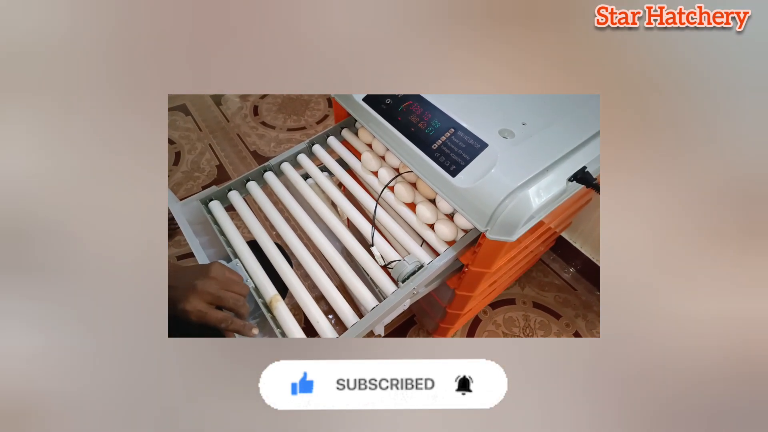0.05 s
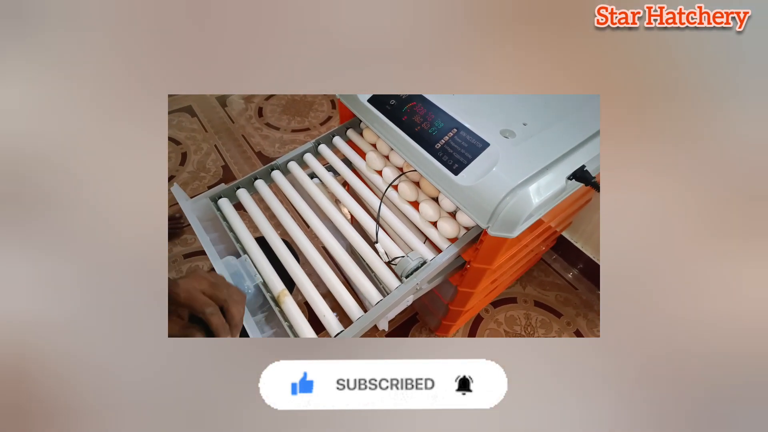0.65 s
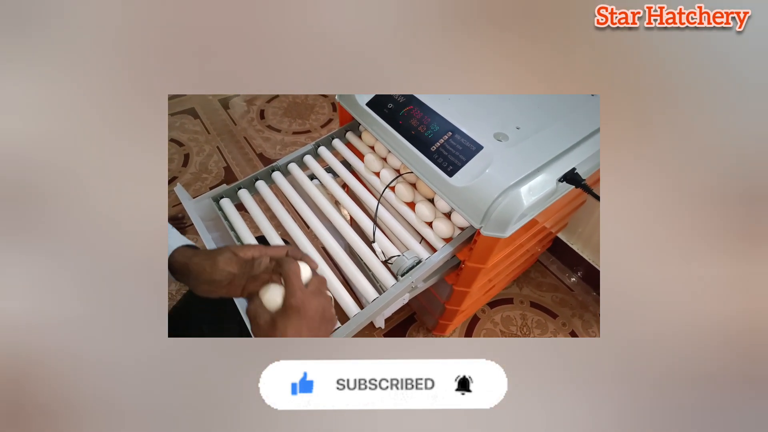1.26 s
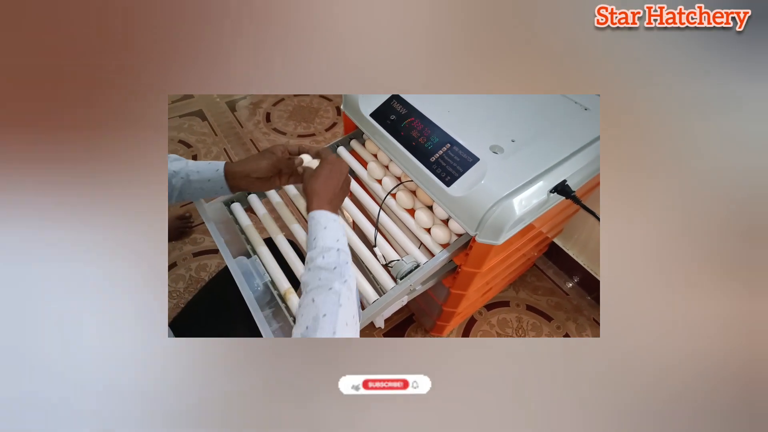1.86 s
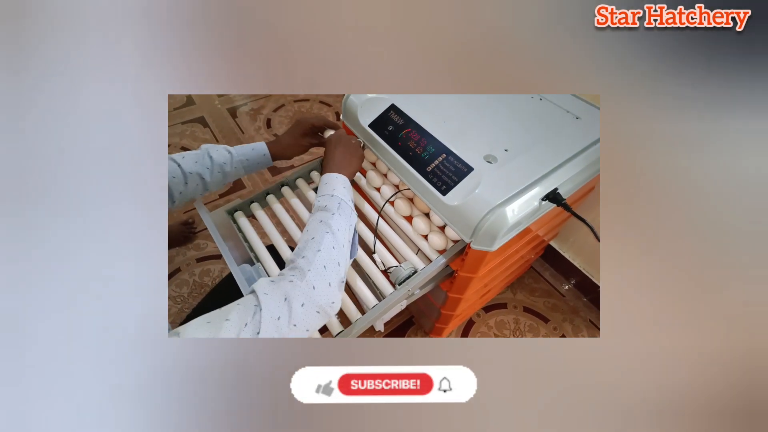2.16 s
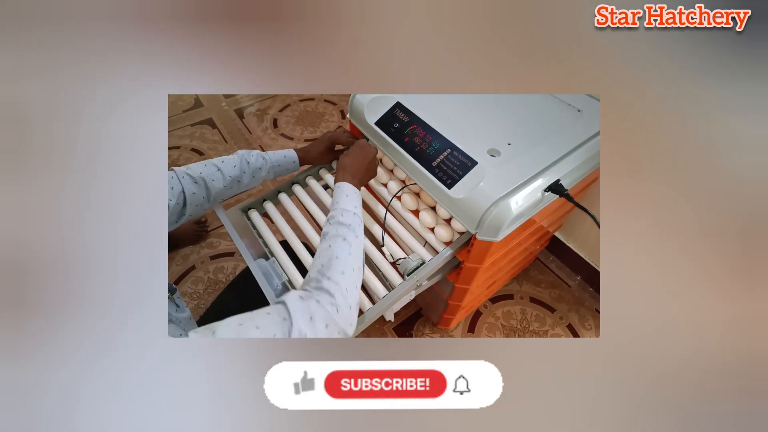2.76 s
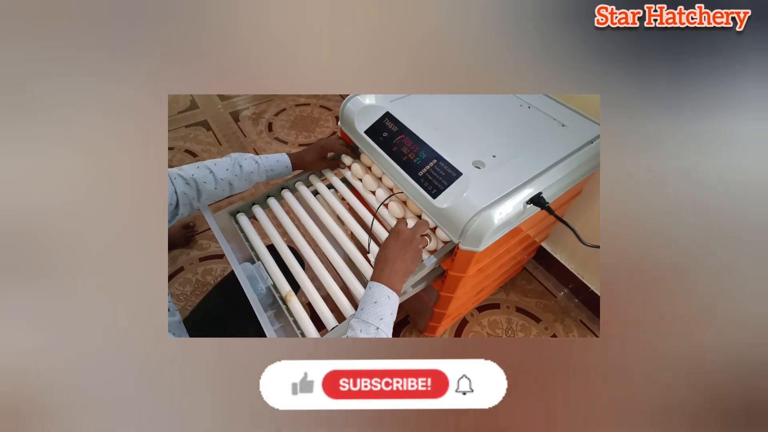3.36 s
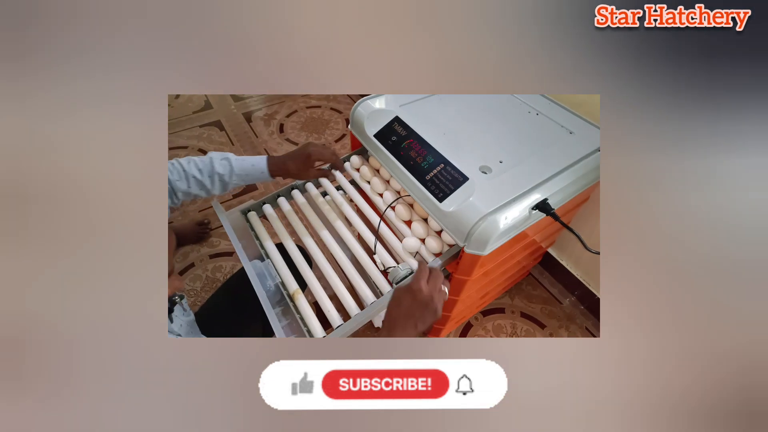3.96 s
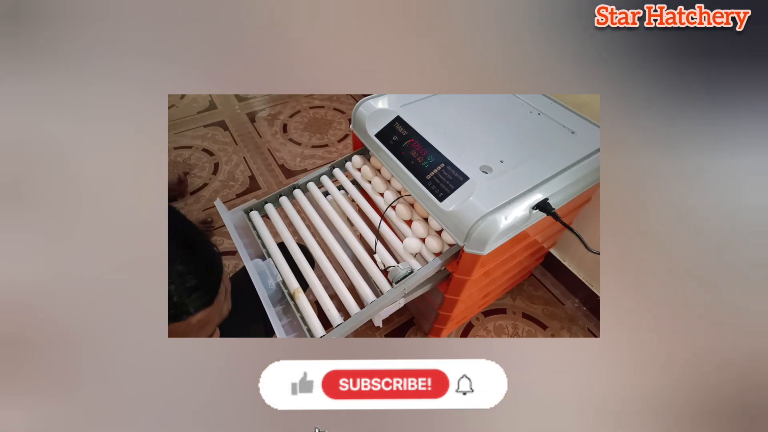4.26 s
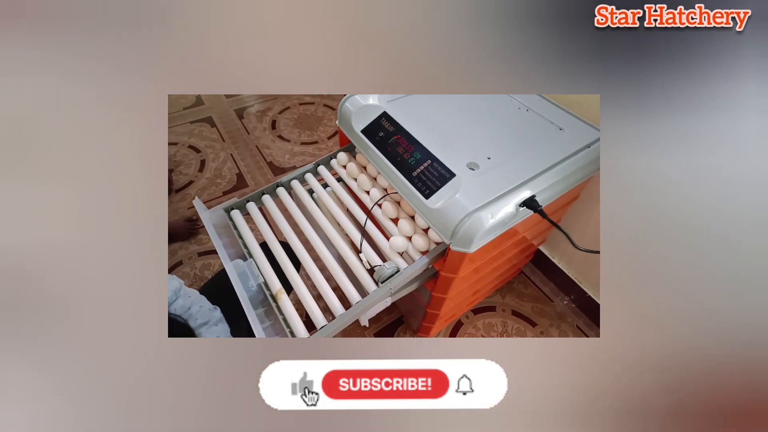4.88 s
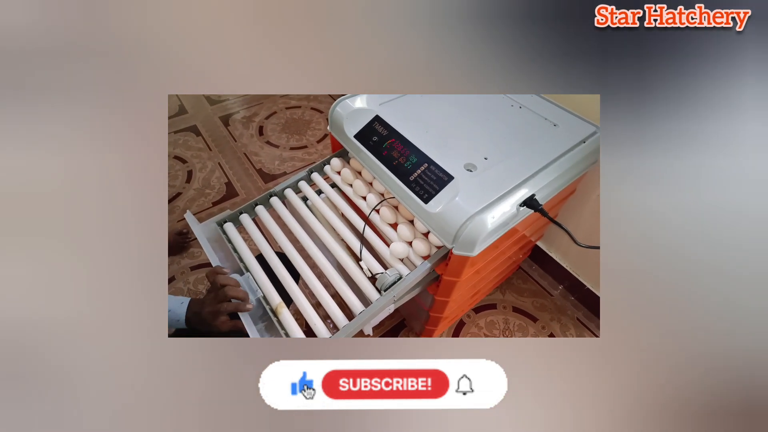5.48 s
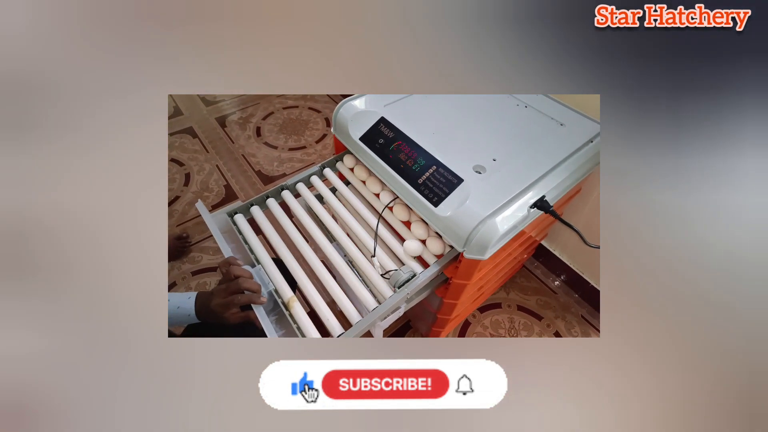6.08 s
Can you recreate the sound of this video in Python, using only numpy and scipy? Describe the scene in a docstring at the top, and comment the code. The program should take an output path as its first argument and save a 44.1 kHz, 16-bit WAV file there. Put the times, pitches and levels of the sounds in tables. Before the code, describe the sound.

Eggs tap lightly against each other and against plastic rollers, in scattered, delicate clinks over the faint hum and hiss of a fan. In the last third, the plastic drawer holding them rattles loudly, rasps and bumps against its housing, then shifts twice more with weaker clicks, scrapes and thumps as the eggs jostle. The sounds are clear and direct, with only a little small-room echo.

```python
"""A small room, where an incubator's fan hums faintly. Eggs are set by hand on the plastic rollers
of its tray: each soft impact excites damped modes of a shell or a hollow roller, giving many
small, soft-edged clinks. Later the tray is handled: hard contacts click, stick-slip friction
rasps, loose rollers rattle and the drawer thumps against its housing."""
import sys
import numpy as np
from scipy import signal
from scipy.fft import rfft, irfft, next_fast_len
from scipy.io import wavfile
from scipy.ndimage import uniform_filter1d, map_coordinates

SR = 44100
rng = np.random.default_rng(int(sys.argv[2]) if len(sys.argv) > 2 else 0)


def persist_wave(psi):
    """Save psi, clipped to +-1, as 16-bit WAV."""
    counts = np.round(np.clip(psi, -1, 1) * 32767).astype(np.int16)
    wavfile.write(sys.argv[1], SR, np.atleast_2d(counts).T)


N = 270333
TIME = np.arange(N) / SR


def amp(db):
    """Amplitude ratio of a level in decibels."""
    return 10 ** (np.asarray(db) / 20)


def unit_rms(x):
    """Normalisation to rms 1."""
    return x / np.sqrt(np.mean(x ** 2) + 1e-20)


def unit_peak(x):
    """Normalisation to peak 1."""
    return x / np.abs(x).max()


def along(points, hz):
    """Interpolation of (f/Hz, value) points on a logarithmic frequency axis."""
    f, values = np.transpose(points)
    return np.interp(np.log(hz + 1), np.log(f + 1), values)


def wobble(rate):
    """Random modulation: a smooth curve through `rate` knots a second."""
    return map_coordinates(rng.standard_normal(int(N * rate / SR) + 4), [TIME * rate])


def filtered(x, response):
    """Linear filtering: the spectrum is multiplied by a frequency response."""
    size = next_fast_len(N + SR // 2)
    return irfft(rfft(x, size) * response(np.fft.rfftfreq(size, 1 / SR)), size)[:N]


def coloured(x, spectrum):
    """Spectral shaping by (f/Hz, level/dB) points, at rms 1."""
    return unit_rms(filtered(x, lambda hz: amp(along(spectrum, hz))))


def impulse_response(spectrum, size=1024):
    """Minimum phase: folding the cepstrum gives a causal pulse with this spectrum."""
    magnitude = amp(along(spectrum, np.fft.rfftfreq(size, 1 / SR)))
    cepstrum = irfft(np.log(magnitude + 1e-6))
    cepstrum[1:size // 2] *= 2
    cepstrum[size // 2 + 1:] = 0
    return irfft(np.exp(rfft(cepstrum)))


def add(track, at, sound):
    """Superposition: a sound joins the track from `at` seconds."""
    start = max(round(at * SR), 0)
    track[start:start + len(sound)] += sound[:max(N - start, 0)]


def struck_modes(modes, scatter_db):
    """Free vibration: modes start at randomly scattered strengths and decay exponentially."""
    t = np.arange(SR // 4) / SR
    out = np.zeros(len(t))
    for k, (hz, db, t60) in enumerate(modes):
        envelope = amp(db + scatter_db * rng.standard_normal() - 60 * t / t60)
        out += (-1) ** k * envelope * np.sin(2 * np.pi * hz * t)
    return unit_peak(out)


def stroke(hold, rise, t60):
    """Envelope of a sustained contact: linear rise, hold, exponential decay."""
    t = np.arange(SR // 4) / SR
    return np.minimum(t / rise, 1) * amp(-60 * np.maximum(t - hold, 0) / t60)


# Reverberation time of the room: f/Hz, T60/s
ROOM_DECAY = [(150, 0.33), (1000, 0.31), (4500, 0.22), (10000, 0.024)]
def reverberation(x):
    """Diffuse reflections: a noise tail whose treble is absorbed fastest."""
    hz, t, bands = signal.stft(rng.standard_normal(SR // 2), SR, nperseg=256)
    decay = amp(-60 * t / along(ROOM_DECAY, hz)[:, None])
    tail = signal.istft(bands * decay, SR, nperseg=256)[1]
    return signal.fftconvolve(x, tail / np.linalg.norm(tail))[:N]


# Course of the air noise, in three consecutive spans: t/s, relative level/dB
AIR_LEVELS = [
    [(0.0, -56), (0.52, -52.5), (0.79, -61.5), (1.54, -57), (1.92, -57), (2.55, -54), (3.27, -60),
     (3.81, -54.5), (4.22, -56)],
    [(4.85, -53), (4.928, -56), (5.12, -58)],
    [(5.6, -54), (5.676, -55.5), (6.13, -57.5)],
]
# Spectra of the swirling air and of the hiss: f/Hz, relative level/dB
AIR_SPECTRUM = [(25, -39.5), (60, -18.5), (95, -4), (170, -7.5), (260, -4.5), (520, -3), (900, -6.5),
                (1300, -8), (1700, -5.5), (2200, -11), (2500, -18.5), (3100, -27.5), (5000, -28),
                (10000, -52.5)]
HISS_SPECTRUM = [(2000, -12), (4100, -6), (4750, 2), (5600, -12), (8200, -9.5), (10000, -20.5)]
# Motor tones: f/Hz, rms level/dB
MOTOR_TONES = [(100, -69.5), (280, -74.5), (525, -70)]
def fan(air_gain_db=1, flutter_db=2.72, waver_rad=0.91, hiss_db=-77):
    """Turbulence gives broadband noise, over a steady hiss and a slightly phase-modulated motor hum."""
    air_db = np.interp(TIME, *np.vstack(AIR_LEVELS).T) + air_gain_db + flutter_db * wobble(3.5)
    hum = sum(amp(db) * np.sqrt(2) * np.sin(2 * np.pi * hz * TIME + waver_rad * wobble(3.5))
              for hz, db in MOTOR_TONES)
    air = amp(air_db) * coloured(rng.standard_normal(N), AIR_SPECTRUM)
    hiss = amp(hiss_db) * coloured(rng.standard_normal(N), HISS_SPECTRUM)
    return air + hiss + hum


def slips(depth_db=6, judder_db=2):
    """Friction noise: shifting contact favours some bands for hundredths of a second, then others."""
    bands = signal.stft(rng.standard_normal(N), nperseg=512)[2]
    patches = uniform_filter1d(rng.standard_normal(bands.shape), size=3, axis=0)  # across frequency
    patches = uniform_filter1d(patches, size=8, axis=1)  # across time
    noise = signal.istft(bands * amp(depth_db * unit_rms(patches)), nperseg=512)[1][:N]
    return noise * amp(judder_db * wobble(220))


# Plastic sliding on plastic: t/s, hold/s, rasp level/dB, body level/dB (both before fading)
SLIDES = [(4.368, .02, -45, -33), (4.428, .095, -38.5, -28), (4.531, 0.18425, -37, -26),
          (5.205, 0.14, -46.5, -50), (5.382, .11, -35.5, -46), (5.829, 0.088, -39.5, -37)]
# Spectra of the rasp and of the hollow tray body: f/Hz, relative level/dB
RASP_SPECTRUM = [(1500, -33.5), (2200, -5), (2650, 1), (3500, -6.5), (4100, -6), (4700, -4.5), (5200, 0.5),
                 (5750, -13.5), (6350, -11), (7600, -17.5), (9000, -22), (10500, -39)]
BODY_SPECTRUM = [(40, -33), (100, 1), (200, -4), (330, -6), (450, -6.5), (620, -6), (900, -8),
                 (1200, -12.5), (1600, -13.5), (2100, -7), (2900, -30), (4800, -94.5)]
def tray_scrapes(rasp_fade_db_per_s=67.5, body_fade_db_per_s=144):
    """Stick-slip friction rasps and drives the hollow tray, fading as the slide slows."""
    rasp_power, body_power = np.zeros(N), np.zeros(N)
    t = np.arange(SR // 4) / SR
    for at, hold, rasp_db, body_db in SLIDES:
        contact = stroke(hold, rise=0.006, t60=0.12)
        add(rasp_power, at, (amp(rasp_db - rasp_fade_db_per_s * t) * contact) ** 2)
        add(body_power, at, (amp(body_db - body_fade_db_per_s * t) * contact) ** 2)
    rasp = np.sqrt(rasp_power) * coloured(slips(), RASP_SPECTRUM)
    body = np.sqrt(body_power) * coloured(slips(), BODY_SPECTRUM)
    return rasp + body


# Bumps of the drawer: t/s, peak level before the bass cut/dB, boost of the lowest mode/dB
BUMPS = [(0.133, -50.5, 12), (4.106, -55, 15.5), (4.387, -19.5, -5.5), (4.397, -12, -8), (4.54, -19, 1.5),
         (4.578, -26.5, -1.5), (4.645, -37, 1), (5.388, -26, 5.5), (5.399, -20, 4), (5.416, -20.5, 2.5),
         (5.52, -37, -0.5), (5.837, -32, 6), (5.856, -26, 3.5)]
# Drawer modes: f/Hz, relative level/dB, T60/s
DRAWER_MODES = [(79, -9.5, 0.14), (159.88, 3.5, 0.11), (217.09, -2, 0.077), (248, 0, 0.041)]
def drawer_thumps(cutoff_hz=60):
    """Bumps excite the drawer's low modes; a body small against the wavelength radiates little bass."""
    out = np.zeros(N)
    hz, lowest_db, t60 = DRAWER_MODES[0]
    for at, db, boost_db in BUMPS:
        modes = [(hz, lowest_db + boost_db, t60), *DRAWER_MODES[1:]]
        add(out, at, amp(db) * struck_modes(modes, scatter_db=4))
    return signal.lfilter(*signal.butter(2, cutoff_hz, "high", fs=SR), out)


# Jolts of the tray: t/s, hold/s, rms level/dB
JOLTS = [(4.3872, 0.0036, -5), (4.396, 0.019, -14.5), (4.417, 0.012, -12.5)]
# Spectrum of the clattering rollers: f/Hz, relative level/dB
CLATTER_SPECTRUM = [(40, -27), (110, -5.5), (200, 5), (340, -4), (500, -8.5), (800, -7), (1080, 4.5),
                    (1500, -4), (2100, -1), (2700, -0.5), (3300, -1.5), (3900, 0.5), (5300, -4.5),
                    (6400, -2.5), (8000, -19.5), (9500, -19), (11000, -45.5)]
def roller_rattles(rise_s=0.003, judder_db=2):
    """Incoherent summation: dense impacts of loose rollers merge into noise bursts that add in power."""
    power = np.zeros(N)
    for at, hold, db in JOLTS:
        add(power, at - rise_s / 2, (amp(db) * stroke(hold, rise_s, t60=0.041)) ** 2)
    impacts = rng.standard_normal(N) * amp(judder_db * wobble(400))
    return np.sqrt(power) * coloured(impacts, CLATTER_SPECTRUM)


# Hard plastic contacts: t/s, snap peak level/dB, relative knock level/dB, T60/s, cutoff f/Hz
HARD_CONTACTS = [(2.4593, -34, -52, 0.0059, 9000), (4.3977, -15, -7.5, 0.0075, 4000),
                 (4.4003, -4.5, -10.5, 0.02124, 9200), (4.409, -18, -21.5, 0.0042, 8000),
                 (4.418, -6, -16, 0.03234, 2951), (4.4316, -5.5, -21, .01, 4492),
                 (4.448, -6.5, -33, 0.01, 3864), (4.540, -7.5, -13.5, 0.0058, 5160),
                 (4.545, 0, -13, 0.006, 9000), (4.5541, -14, -18, 0.0033, 8100),
                 (4.578, -1, -11, 0.0074, 6800), (4.6304, -5, -25, 0.0047, 9000),
                 (4.6464, -10, -36.5, 0.0078, 4360), (5.155, -22.5, -40, 0.0026, 2200),
                 (5.2188, -8, -38, 0.0091, 3670), (5.4014, -2, -21, 0.0054, 12000),
                 (5.4177, -9.5, -42.5, 0.005876, 2639), (5.515, -27.5, -46, 0.011, 1506),
                 (5.834, -29, -47.5, 0.011, 4000), (5.863, -19.5, -34, .012, 5830)]
# Spectrum of the snap: f/Hz, relative level/dB
SNAP_SPECTRUM = [(700, -22), (1200, -27), (1600, -24.5), (2050, -6.5), (2600, 2.5), (3300, -6.5),
                 (4200, -2.5), (6000, -9.5), (6800, -12), (8200, -12.5), (9200, -18), (10500, -36.5)]
# Tray modes: f/Hz, relative level/dB, T60/s
TRAY_MODES = [(341, -1, 0.038), (497, -8.5, 0.058), (697, -4, 0.03), (1051, -5.5, 0.04),
              (1207, -13.5, .045), (1540, -7, 0.046), (1756, -6.5, 0.02)]
def tray_clicks(grit=0.84, knock_gain_db=-3):
    """Impulsive excitation: each contact snaps with a splintery tail and rings the tray's modes."""
    out = np.zeros(N)
    t = np.arange(SR // 20) / SR
    snap = impulse_response(SNAP_SPECTRUM)
    for at, snap_db, knock_db, t60, cutoff_hz in HARD_CONTACTS:
        force = grit * rng.standard_normal(len(t)) * amp(-60 * t / t60)
        force[0] = 1
        force = signal.lfilter(*signal.butter(2, cutoff_hz, fs=SR), force)  # softer contact is duller
        add(out, at, amp(snap_db) * unit_peak(signal.fftconvolve(force, snap)))
        add(out, at, amp(knock_db + knock_gain_db) * struck_modes(TRAY_MODES, scatter_db=8))
    return out


# Spectrum of a faint hiss that swells and fades with each clink, pip and nudge: f/Hz, relative level/dB
PULSE_HISS_SPECTRUM = [(100, -40.5), (2000, 1.5), (3000, 9), (4500, 7), (6500, 8.5), (9000, 2.5),
                       (10500, -38)]
def soft_contacts(pulses, hiss_db, steepness=2.25, drift_per_s=300):
    """Soft impacts give bell-shaped tone pulses: centre t/s, f/Hz, level/dB, duration/s, waver/rad."""
    tones, power = np.zeros(N), np.zeros(N)
    t = np.arange(-SR // 10, SR // 10) / SR
    for at, hz, db, duration, waver in pulses:
        swell = amp(db) * 0.5 ** (np.abs(2 * t / duration) ** steepness)  # duration at half amplitude
        drift = map_coordinates(rng.standard_normal(256), [(t - t[0]) * drift_per_s], mode="wrap")
        tone = swell * np.sin(2 * np.pi * (hz * t + rng.random()) + waver * drift)
        start = at + t[0]
        skip = max(round(-start * SR), 0)
        add(tones, start, tone[skip:])
        add(power, start, swell[skip:] ** 2)
    hiss = amp(hiss_db) * np.sqrt(power) * coloured(rng.standard_normal(N), PULSE_HISS_SPECTRUM)
    return tones + hiss


# Eggs nudging rollers: t/s, low f/Hz, low level/dB, high f/Hz, high level/dB, duration/s
ROLLER_NUDGES = [(0.069, 510, -24.5, 1363, -31, 0.019), (0.09, 530, -32, 1279, -34.5, .015),
                 (0.596, 380, -37.5, 1446, -42.5, 0.010144), (1.063, 246.7, -51, 361.7, -39.5, 0.016),
                 (1.315, 520, -53, 1498, -35.5, 0.01632), (1.604, 523.3, -63.5, 1556, -37.5, 0.016455),
                 (2.215, 524.1, -38.5, 1470, -66.5, .018), (2.388, 603.6, -38, 966, -42, 0.01576),
                 (3.625, 254.5, -44, 756.8, -43, 0.015), (3.805, 482.7, -42, 740, -44.5, .016),
                 (4.266, 501, -29.5, 1469, -68, .025), (4.308, 517, -38, 1500, -63, 0.04),
                 (4.372, 397.9, -40, 1403, -52, 0.01971), (4.479, 399, -37, 1624, -29, .012),
                 (4.603, 406, -30.5, 852.6, -47, 0.014), (4.655, 852.6, -35.5, 1690, -53, 0.024),
                 (4.723, 838.9, -52, 1683, -39.5, 0.031), (5.23, 493.3, -60, 766, -41.5, .025),
                 (5.342, 447, -41, 776, -57, 0.035), (5.511, 201.6, -25, 560, -56.5, 0.0086),
                 (5.678, 183, -44.5, 560, -60, 0.014), (5.87, 564.7, -28.5, 914, -36, 0.01324),
                 (5.905, 559, -44, 1539, -39.5, 0.05164), (5.974, 525, -36, 1564, -44, 0.02759)]
def roller_nudges(low_waver_rad=0.06, high_waver_rad=0.19):
    """Resonance of a hollow body: a nudged roller sounds two of its modes."""
    low = [(at, hz, db, duration, low_waver_rad) for at, hz, db, _, _, duration in ROLLER_NUDGES]
    high = [(at, hz, db, duration, high_waver_rad) for at, _, _, hz, db, duration in ROLLER_NUDGES]
    return soft_contacts(low + high, hiss_db=-33.5)


# Eggs landing on the rollers, and a light tick at 4.135 s: t/s, rms level before decay/dB, T60/s, frequency
# ratio of the shell
LANDINGS = [(2.378, -38, 0.12456, 0.93), (2.394, -47, 0.1885, 0.94), (2.456, -25, 0.04517, 1.0166),
            (2.47, -44.5, 0.2, 1.03), (4.135, -44.5, 0.06, 0.72)]
# Shell resonances: f/Hz, bandwidth/Hz, relative level/dB
SHELL_RESONANCES = [(2723.6, 110, -5), (3790, 370, -0.5), (4826, 164, 7), (5390, 660, -3),
                    (7760, 1218, -17)]
def egg_drops(rise_s=0.0019):
    """Forced vibration: an egg chatters to rest, driving its shell's resonances with decaying noise."""
    out = np.zeros(N)
    t = np.arange(SR // 4) / SR
    f = np.fft.rfftfreq(len(t), 1 / SR)
    for at, db, t60, ratio in LANDINGS:
        shell = sum(amp(level) / (1 + (2 * (f / ratio - hz) / width) ** 2)
                    for hz, width, level in SHELL_RESONANCES)
        chatter = unit_rms(irfft(rfft(rng.standard_normal(len(t))) * shell, len(t)))
        envelope = amp(db - 60 * t / t60) * (1 - np.exp(-t / rise_s))
        add(out, at, chatter * envelope)
    return out


def mode_pair(at, hz, db, duration, waver, lag_s=0.008, detune=1.022, twin_db=-10, stretch=1.9):
    """Beating: the shell's high mode and a later, longer twin close in frequency make a rough ring."""
    twin = (at + lag_s, hz * detune, db + twin_db, duration * stretch, waver)
    return [(at, hz, db, duration, waver), twin]


# Shell grazing shell: t/s, f/Hz, peak level/dB, duration/s
SHELL_GRAZES = [(0.24, 4800, -41.5, .008), (1.101, 4900, -52, .009), (1.387, 4630, -46, 0.00648),
                (1.55, 4690, -46, .015), (1.677, 4630, -53, .008), (1.821, 4660, -42, 0.008518),
                (2.111, 4520, -39.5, 0.011), (2.266, 4700, -56, 0.01916), (2.552, 4750, -52.5, .021),
                (2.831, 4660, -40, .008), (2.855, 4690, -44.5, 0.01054), (2.93, 5330, -38, 0.0026),
                (3.414, 4240, -56, .014), (3.556, 4220, -44.5, 0.018), (3.698, 4530, -44, 0.006565),
                (3.839, 4526, -41, 0.00578), (3.987, 4690, -32.5, 0.010768), (3.999, 4258, -42, 0.011),
                (4.275, 4860, -36, 0.008413)]
def egg_grazes(waver_rad=0.55):
    """Glancing contact excites only the shell's high modes, in thin pips."""
    pulses = [pulse for graze in SHELL_GRAZES for pulse in mode_pair(*graze, waver_rad)]
    return soft_contacts(pulses, hiss_db=-20)


# Egg meeting egg: t/s, low f/Hz, low level/dB, high level/dB, duration/s, rebound gap/s, rebound loss/dB
COLLISIONS = [(.08, 2035, -16.5, -57, 0.005787, .016, 12.5), (0.119, 1906, -37, -65.5, 0.013, 0.03126, 18),
              (0.23, 2118, -26.5, -38.5, 0.01331, 0.03, 7.5), (0.37, 2073, -17, -32, 0.007718, .014, 7),
              (0.41, 2145, -33, -48, 0.011286, 0.018, 32), (.516, 2115, -24, -46.5, 0.017, 0.038, 6),
              (.519, 1811, -33.5, -62, 0.015, 0.05157, 2.5),
              (.591, 1732, -39.5, -71.5, 0.01805, 0.0313, 20), (0.664, 2103, -42, -67, 0.016, 0.031, 9),
              (0.804, 1863, -46, -76, 0.011475, 0.02642, 13), (0.951, 2115, -37.5, -56, 0.012, 0.038, 4.5),
              (0.954, 1770, -35.5, -51, 0.01034, 0.024, 6), (1.009, 1731, -42, -72, 0.01558, 0.036, 26.5),
              (1.242, 1830, -49, -68.5, .014, 0.03138, 22.5),
              (1.537, 2295, -39.5, -41.5, 0.013887, 0.019954, 16),
              (1.971, 2114, -33, -52, 0.017486, 0.03, 1), (2.143, 1767, -39, -68, .019, 0.02552, 26.5),
              (2.385, 2006, -32, -44, 0.0088, 0.014536, 0.5),
              (2.465, 1955, -29.5, -50.5, 0.0076, 0.02205, 4),
              (2.575, 1773, -40.5, -61, 0.01924, .03, 24.5), (2.873, 2106, -45, -62, 0.012256, .03, 20),
              (3.422, 2085, -36, -66, .02, 0.034, 0), (3.568, 2115, -34.5, -55.5, 0.013, .027, -0.5),
              (3.731, 1768, -35, -69, .018, 0.0374, 29.5), (3.866, 1737, -33, -71, 0.024, 0.025, 18),
              (4.003, 2115, -31, -42.5, 0.013947, 0.027, 3.5),
              (4.288, 2124, -36.5, -42.5, .018, 0.024, 22.5), (4.568, 2096, -24.5, -47.5, 0.01434, 0.04, 4),
              (4.711, 2083, -18.5, -54.5, .0085, 0.019378, 8), (4.749, 2077, -30, -62, 0.01298, 0.0351, 16),
              (4.857, 2124, -33.5, -49.5, 0.011, 0.023, 23.5), (4.998, 2105, -28, -48, 0.016, 0.031, 22),
              (5.151, 2163, -32.5, -56, 0.019, 0.02474, 10), (5.279, 2106, -21.5, -37, 0.013, 0.019, 5),
              (5.429, 2122, -22.5, -37.5, 0.01985, 0.056, 17.5),
              (5.574, 2113, -25.5, -55.5, .018, 0.036, 22), (5.867, 2073, -29.5, -37.5, 0.015, 0.02743, 6),
              (6.013, 2114, -32.5, -63, 0.015, 0.04147, 11.5)]
def egg_clinks(high_hz=4635, high_loss_db=3, settle_db=23.5, soften=1.1034,
               low_waver_rad=0.12, high_waver_rad=0.99):
    """Inelastic collision: each egg touches three times, ever softer, ringing low and high shell modes."""
    pulses = []
    for first, low_hz, low_db, high_db, first_duration, gap, loss_db in COLLISIONS:
        for k in range(3):
            at = first + k * gap
            duration = first_duration * soften ** k
            fall_db = k * loss_db + settle_db * (k == 2)  # the egg settles on its last touch
            high_fall_db = fall_db + k * high_loss_db  # longer contact excites the high mode less
            pulses.append((at, low_hz, low_db - fall_db, duration, low_waver_rad))
            pulses += mode_pair(at, high_hz, high_db - high_fall_db, duration, high_waver_rad)
    return soft_contacts(pulses, hiss_db=-26)


def scene(egg_room_db=-18, tray_room_db=-25):
    """Superposition of the direct sound of eggs and tray, their reverberation and the fan."""
    eggs = egg_clinks() + egg_grazes() + roller_nudges() + egg_drops()
    tray = tray_clicks() + drawer_thumps() + roller_rattles() + tray_scrapes()
    room = reverberation(amp(egg_room_db) * eggs + amp(tray_room_db) * tray)
    return (eggs + tray + room + fan())[None]


def record(dry, treble_hz=10313, ceiling=0.95, distortion_db=-22, limit_hz=15750):
    """Band limiting and saturation: the microphone cuts the top treble and rounds the loudest peaks."""
    def treble(hz):
        return 1 / np.sqrt(1 + (hz / treble_hz) ** 100)

    def passband(hz):  # distortion above the treble edge passes weakly, up to the band limit
        return np.maximum(treble(hz), amp(distortion_db)) * (hz < limit_hz)

    heard = filtered(dry[0], treble)
    rounded = heard / (1 + np.abs(heard / ceiling) ** 6) ** (1 / 6)
    return filtered(rounded, passband)[None]


dry = scene()
out = record(dry)
persist_wave(out)
```